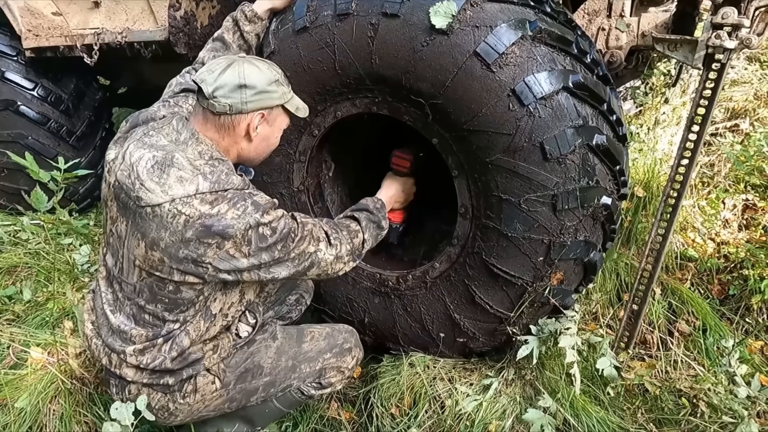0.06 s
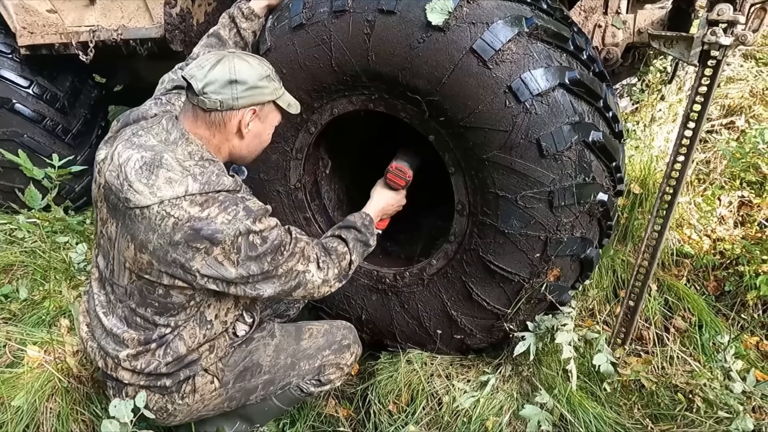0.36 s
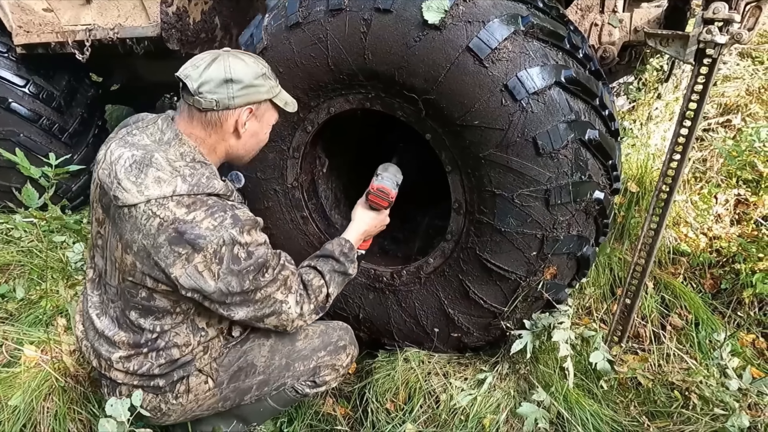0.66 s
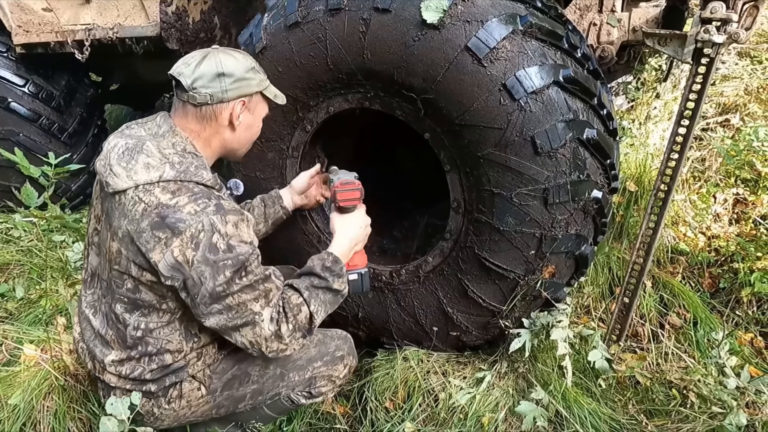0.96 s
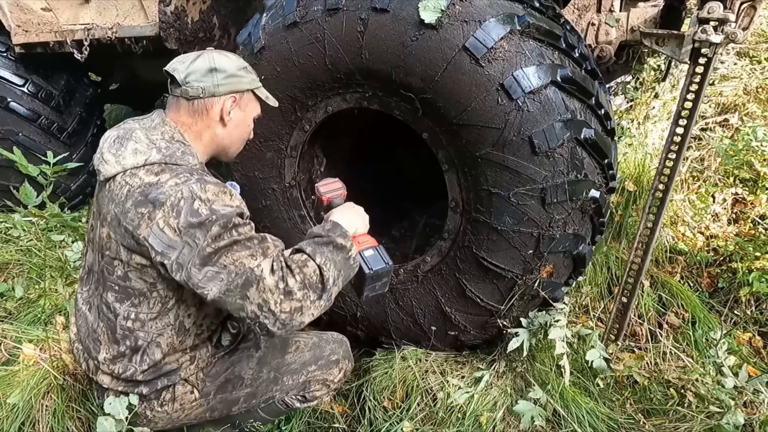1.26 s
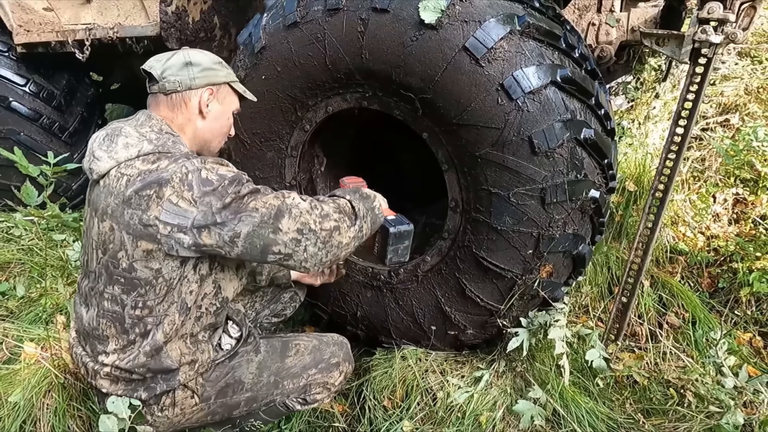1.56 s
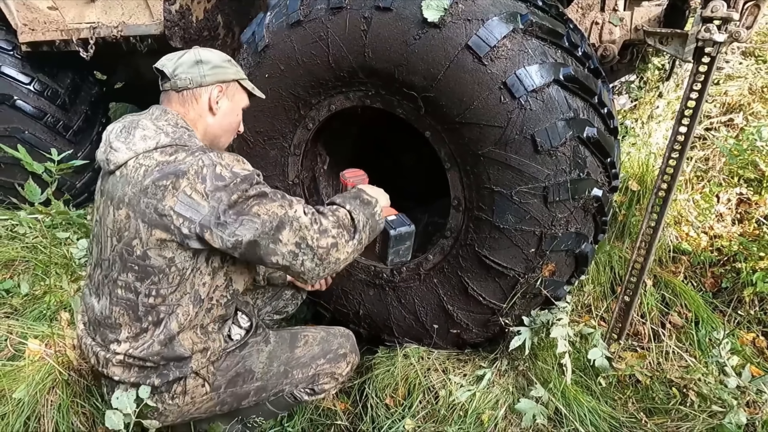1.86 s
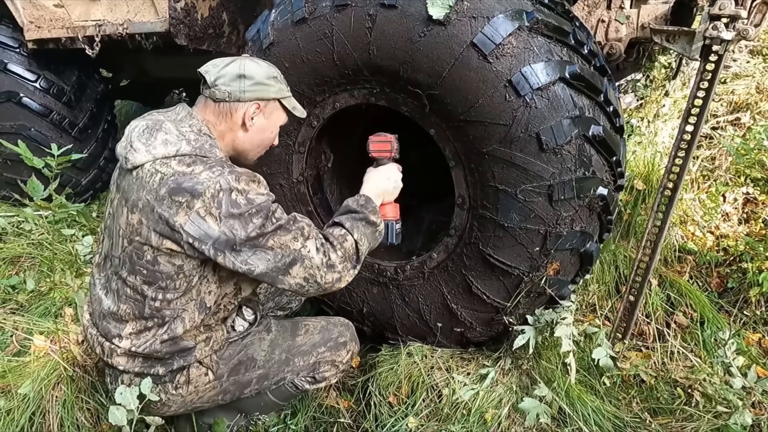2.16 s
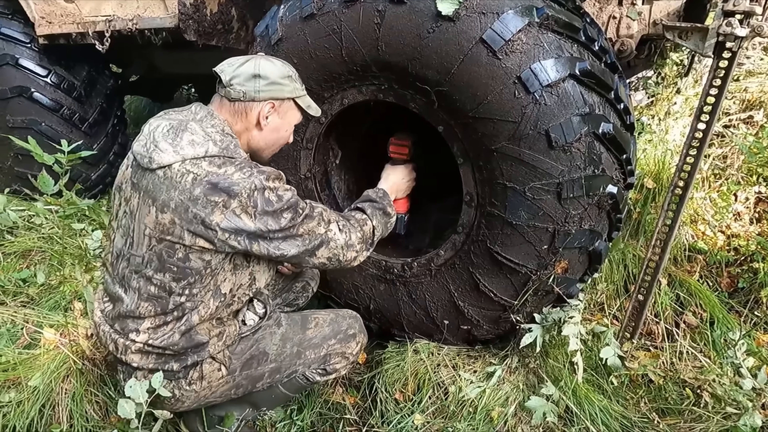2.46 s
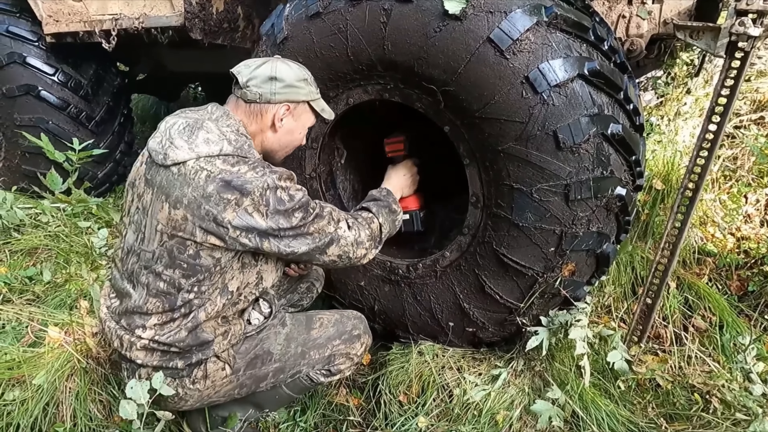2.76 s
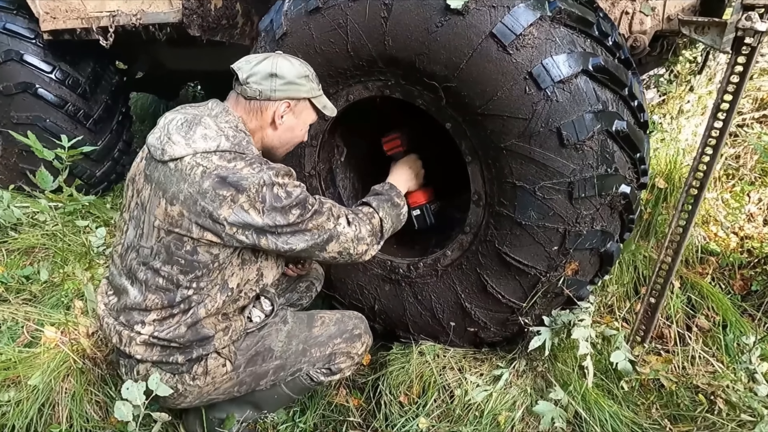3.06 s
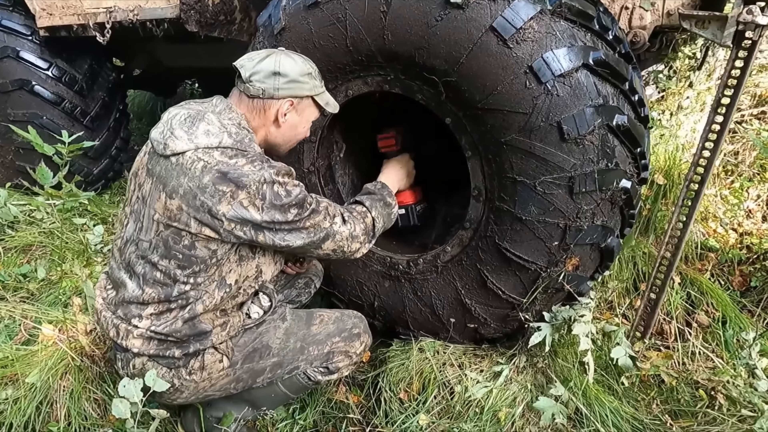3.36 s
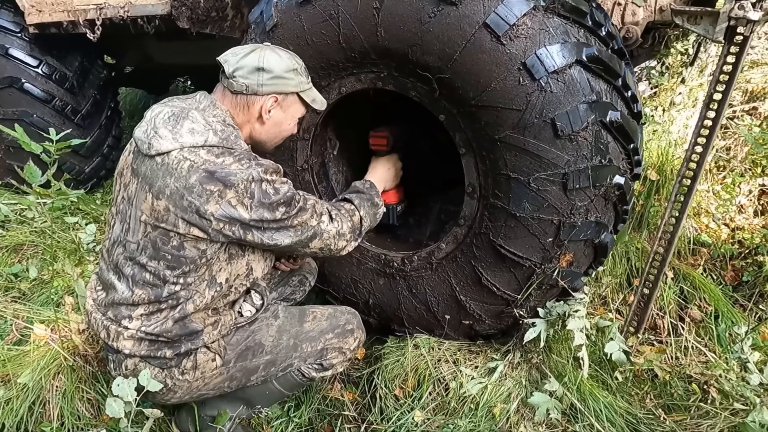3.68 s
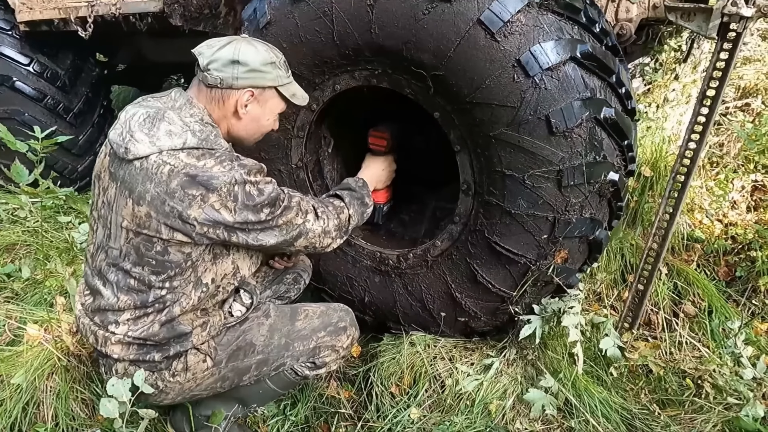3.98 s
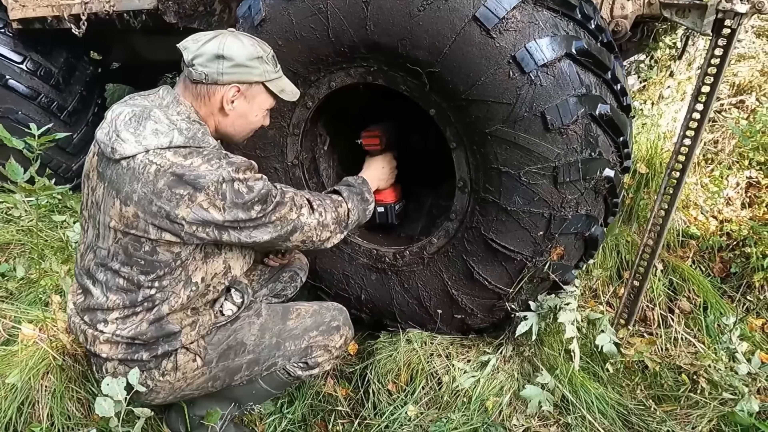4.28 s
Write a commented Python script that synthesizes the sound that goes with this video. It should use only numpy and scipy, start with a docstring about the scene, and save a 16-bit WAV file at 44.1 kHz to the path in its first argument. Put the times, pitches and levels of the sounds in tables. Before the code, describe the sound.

A cordless impact wrench whines and hammers in short bursts on wheel nuts, between ringing steel clangs and knocks, in a quiet forest.

```python
"""A cordless impact wrench spins wheel nuts off inside the deep steel rim of a big tyre, outdoors.
Its gears whine and the loose socket rattles; on a tight nut the hammer strikes about 32 times a second.
Between runs the socket knocks on the studs, steel clangs on the ringing rim, and metal gives
bright chinks and hollow knocks. Behind it, a quiet forest: leaves hiss and the air stirs."""
import sys
import numpy as np
from scipy import signal
from scipy.fft import rfft, irfft, next_fast_len
from scipy.io import wavfile

SR = 44100
rng = np.random.default_rng(int(sys.argv[2]) if len(sys.argv) > 2 else 0)


def unload_wav(signal):
    """Save mono or channel-first audio to the path in sys.argv[1] as 16-bit WAV at rate SR, clipped to [-1, 1]."""
    wavfile.write(
        sys.argv[1],
        SR,
        np.round(np.clip(np.atleast_2d(signal).T, -1, 1) * 32767).astype(np.int16),
    )


N = 398663
TIME = np.arange(N) / SR
BLOWS_PER_S = 32.55

# Trigger pulls. Each row: pull and release in seconds, then gears, loose socket, treble fizz,
# boost at full load and coasting, all in dB.
RUNS = [(-0.1, 0.2, -17, -32.5, -42.5, 2.5, -54), (3.481, 4.383, -17, -33, -32.5, 2.5, -52),
        (6.994, 7.168, -16.5, -20, -25.5, 0, -35.5), (7.328, 7.73, -17, -26, -33, 6, -52),
        (8.107, 8.372, -11, -19.5, -27, 0, -36)]
# Working speed the nut allows. Each row: time in seconds, rotor turns per second.
WORKING_SPEED = [(0.02, 372), (.11, 445), (3.56, 415), (3.67, 408), (3.76, 338), (4.14, 345), (4.25, 410),
                 (4.32, 445), (7.06, 390), (7.42, 385), (7.455, 420), (7.49, 374), (7.53, 366), (7.59, 415),
                 (7.7, 445), (8.19, 385), (8.27, 426), (8.38, 445)]
# Hammering on a tight nut. Each row: first and last blow in seconds, crack, clank and thud in dB.
HAMMERING = [(3.574, 3.635, -13, -13.5, -6), (3.764, 4.133, -9, -14.5, -21),
             (7.06, 7.154, -13, -19.5, -12.5)]
# Spectra of the tool housing and the rim's dense modes. Each row: frequency in Hz, relative level in dB.
HOUSING_SPECTRUM = [(300, -10.5), (540, -4), (700, -7), (950, -4.5), (1290, 0.5), (1490, -6), (1750, -5),
                    (2000, -2), (2450, -10.5), (2720, 8.5), (2920, 6.5), (3250, -12), (3800, -2),
                    (4300, -9.5), (5000, -1.5), (6200, -10), (6700, -19.5), (7500, -8.5), (8500, -33),
                    (11000, -46)]
RIM_SPECTRUM = [(450, -8.5), (750, -6), (1050, 2.5), (1400, -3.5), (1900, -12.5), (2250, -0.5), (2550, -14),
                (2950, -3), (3250, -22.5), (3600, -19.5)]


def amp(db):
    """Decibels to gain."""
    return 10 ** (np.asarray(db) / 20)


def unit_rms(x):
    """Scales to rms 1."""
    return x / np.sqrt(np.mean(x ** 2) + 1e-20)


def unit_attack(x):
    """Scales a hit to rms 1 over its first 12 ms."""
    return x / np.sqrt(np.mean(x[:round(.012 * SR)] ** 2) + 1e-20)


def db_at(spectrum, hz):
    """Interpolates a spectrum on a log-frequency axis."""
    knots_hz, db = np.transpose(spectrum)
    return np.interp(np.log(hz + 1), np.log(knots_hz + 1), db)


def add(mix, start_s, sound):
    """Lays a sound into the mix."""
    part = mix[max(round(start_s * SR), 0):][:len(sound)]
    part += sound[:len(part)]


def colour(x, spectrum):
    """Minimum-phase filter, falling 24 dB per octave beyond the spectrum's ends."""
    hz = abs(np.fft.fftfreq(4096, 1 / SR)) + 1
    octaves_below = np.maximum(np.log2(spectrum[0][0] / hz), 0)
    octaves_above = np.maximum(np.log2(hz / spectrum[-1][0]), 0)
    gain_db = np.maximum(db_at(spectrum, hz) - 24 * (octaves_below + octaves_above), -100)
    response = np.exp(np.conj(signal.hilbert(np.log(amp(gain_db)))))
    return signal.oaconvolve(x, np.fft.ifft(response).real)[:len(x)]


def noise(spectrum, samples=N):
    """Coloured Gaussian noise."""
    return colour(rng.standard_normal(samples), spectrum)


def wander(rate_hz):
    """Smooth random drift, rms 1."""
    size = next_fast_len(N)
    hz = np.fft.rfftfreq(size, 1 / SR)
    return unit_rms(irfft(rfft(rng.standard_normal(size)) / (1 + (hz / rate_hz) ** 4), size)[:N])


def ring(modes, t, scatter_db, detune=0.):
    """Decaying modes, each struck a little differently."""
    hz, db, t60_s = np.transpose(modes)[:, :, None]
    strength, shift = rng.standard_normal((2, len(modes), 1))
    sign = rng.choice([-1, 1], (len(modes), 1))
    envelope = amp(db + scatter_db * strength - 60 * t / t60_s)
    return (sign * envelope * np.sin(2 * np.pi * hz * (1 + detune * shift) * t)).sum(0)


def spin(pull_s, release_s, spin_up_s=0.08, brake_s=0.045):
    """Share of working speed: soft start, hold, brake."""
    braking = np.exp(-np.maximum(TIME - release_s, 0) / brake_s)
    return np.clip((TIME - pull_s) / spin_up_s, 0, 1) * braking


def blow_times(first_s, last_s):
    """The hammer slips over its cam at a steady rate."""
    return first_s + np.arange(round((last_s - first_s) * BLOWS_PER_S) + 1) / BLOWS_PER_S


def rotor_speed(sag=.15):
    """Turns per second: the rotor leaps after each blow, then slows as it winds the hammer spring."""
    blows_s = np.concatenate([blow_times(first_s, last_s) for first_s, last_s, *_ in HAMMERING])
    latest_s = blows_s[np.maximum(np.searchsorted(blows_s, TIME) - 1, 0)]
    cycle = (TIME - latest_s) * BLOWS_PER_S
    winding = np.where((cycle > 0) & (cycle < 1), .5 - cycle, 0)
    flutter = .005 * wander(rate_hz=80.)
    share = np.max([spin(pull_s, release_s) for pull_s, release_s, *_ in RUNS], axis=0)
    return share * np.interp(TIME, *np.transpose(WORKING_SPEED)) * (1 + sag * winding + flutter)


def gear_whine(rotor_hz, turns, case_hz=4950, case_width_hz=450, case_db=11):
    """Rough gear tones, loudest under load and near the gear case resonance."""
    # One entry per tone: multiple of rotor speed; relative level in dB.
    orders = [3, 4, 5, 6, 7, 8, 10, 11, 12, 13, 14, 15, 17.5]
    levels_db = [-1.5, 4.5, -1.5, -2.5, -0.5, -2.5, -8.5, -12, -1.5, -19, -17, -2, -7]
    out = np.zeros(N)
    for order, db in zip(orders, levels_db):
        resonance_db = case_db / (1 + ((order * rotor_hz - case_hz) / case_width_hz) ** 2)
        backlash_rad = .36 * wander(rate_hz=200.)
        gain = amp(db + resonance_db + 4 * wander(rate_hz=70.))
        out += gain * np.sin(2 * np.pi * order * turns + backlash_rad)
    load_gain = np.interp(rotor_hz, [200, 335, 385, 425, 445], [0, 1.6, 1.2, .75, .3])
    return load_gain * out


def wrench(ticks_per_s=700., free_hz=456, loaded_hz=384, spin_exponent=3.8, coast_s=0.16):
    """Gear teeth and the loose socket excite the housing, louder with spin and load."""
    # Socket rattle, treble fizz, coasting socket. Each row: frequency in Hz, relative level in dB.
    socket_spectrum = [(700, -18.5), (1000, -12), (1250, 2.5), (1500, -0.5), (1780, 3), (2100, -15),
                       (2600, -14)]
    fizz_spectrum = [(5000, -19.5), (8000, -3.5), (10500, -3), (12500, -4.5), (15000, -19)]
    coast_spectrum = [(150, 5.5), (500, 2.5), (900, 0.5), (1450, 10.5), (2200, -7.5), (2830, -2),
                      (3300, -16.5), (5200, -11.5), (7000, -15.5), (12000, -26)]
    rotor_hz = rotor_speed()
    turns = np.cumsum(rotor_hz) / SR
    ticks = (rng.random(N) < ticks_per_s / SR) * rng.standard_normal(N)
    turn_swell = 1 + 0.082 * np.cos(2 * np.pi * turns)
    socket_wobble = amp(1.5 * wander(rate_hz=60.))
    drive = (rng.standard_normal(N) + unit_rms(ticks)) * turn_swell * socket_wobble
    spectra = HOUSING_SPECTRUM, socket_spectrum, fizz_spectrum, coast_spectrum
    housing, socket, fizz, coasting = (unit_rms(colour(drive, spectrum)) for spectrum in spectra)
    gears = amp(-4) * housing + amp(-15.5) * gear_whine(rotor_hz, turns)
    working_hz = np.interp(TIME, *np.transpose(WORKING_SPEED))
    load = np.clip((free_hz - working_hz) / (free_hz - loaded_hz), 0, 1)
    out = np.zeros(N)
    for pull_s, release_s, gears_db, socket_db, fizz_db, load_db, coast_db in RUNS:
        gain = spin(pull_s, release_s) ** spin_exponent * amp(load_db * load)
        out += gain * (amp(gears_db) * gears + amp(socket_db) * socket + amp(fizz_db - 4.5) * fizz)
        # The loose socket keeps turning briefly after release.
        after_s = np.maximum(TIME - release_s, 0)
        out += amp(coast_db) * (after_s > 0) * np.exp(-(after_s / coast_s) ** 2) * coasting
    return out


def forest(stereo_spread=0.6, stir_db=-54.5):
    """Leaves hiss, air stirs; a soft handling rustle swells near 3.2 s, one low puff of wind at 5.3 s."""
    # Each row: frequency in Hz, relative level in dB.
    air_spectrum = [(12, -26), (20, 3.5), (51, -2.5), (84, -30.5), (108, -12.5), (278, -21.5), (347, -27.5),
                    (587, -39.5), (1640, -29.5), (1780, -35.5), (2850, -40), (3760, -45.5), (12000, -57),
                    (15000, -66.5)]
    # Each row: time in seconds, leaf hiss in dB.
    hiss_levels = [(0.7, -61), (1.7, -56), (4.7, -53.5), (6.3, -50.5), (9, -54)]
    # Each row: centre and half width in seconds, change of stir and of hiss in dB.
    swells = [(3.199, 0.6, 10, 6), (5.331, 0.06, 22, -3.5)]
    mid, side = noise(air_spectrum), noise(air_spectrum)
    air = mid + stereo_spread * np.array([[1], [-1]]) * side
    hiss = signal.sosfilt(signal.butter(2, 170, "high", fs=SR, output="sos"), air)
    low = signal.sosfilt(signal.butter(2, 130, fs=SR, output="sos"), air)
    hiss_db = np.interp(TIME, *np.transpose(hiss_levels)) + wander(rate_hz=8.)
    low_db = stir_db + 2.5 * wander(rate_hz=1.7)
    for centre_s, width_s, swell_low_db, swell_hiss_db in swells:
        swell = np.exp(-((TIME - centre_s) / width_s) ** 2)
        hiss_db += swell_hiss_db * swell
        low_db += swell_low_db * swell
    return amp(hiss_db) * unit_rms(hiss) + amp(low_db) * unit_rms(low)


def wheel_rumble(rise_s=0.023, t60_s=0.24):
    """The heavy wheel shakes under the running tool and settles when the push ends."""
    # Each row: start and end in seconds, level in dB.
    pushes = [(0.035, 0.2, -27.5), (3.565, 3.66, -13), (3.77, 4.33, -27), (7.047, 7.16, -15),
              (7.42, 7.72, -30.5), (8.23, 8.33, -24)]
    # Each row: frequency in Hz, relative level in dB.
    spectrum = [(15, -39.5), (25, -22), (43, -11), (75, -9.5), (119, -2.5), (157, 6), (226, -7), (268, -8),
                (450, -21), (580, -50.5), (990, -120)]
    envelope = np.zeros(N)
    for start_s, end_s, db in pushes:
        rise = np.clip((TIME - start_s) / rise_s, 0, 1)
        envelope += rise * amp(db - 60 * np.maximum(TIME - end_s, 0) / t60_s)
    return envelope * unit_rms(noise(spectrum))


def steel_burst(spectrum, t, t60_s, tail_db, tail_t60_s, rise_s=.0015):
    """Dense steel modes: a fast-dying burst and its tail in the rim."""
    fade = amp(-60 * t / t60_s) + amp(tail_db - 60 * t / tail_t60_s)
    rise = 1 - np.exp(-t / rise_s)
    return unit_attack(colour(rng.standard_normal(len(t)) * fade * rise, spectrum))


def strike(crack_db, clank_db, thud_db, t60_s, body_spectrum=None):
    """One blow: bright crack, clank of the struck steel, thud of the wheel well."""
    # Crack and default clank. Each row: frequency in Hz, relative level in dB.
    crack_spectrum = [(1800, -22), (2500, 0.5), (2740, 14), (2950, 9), (3300, -2.5), (5000, 0.5),
                      (6500, -8.5), (8500, -15), (11000, -12), (15000, -30)]
    clank_spectrum = [(200, -4.5), (330, -4), (500, -4), (600, -9.5), (780, -3), (880, -6), (1290, -1.5),
                      (1650, -6.5), (2000, -6.5), (2600, -16), (3500, -29)]
    # Air in tyre and wheel well. Each row: frequency in Hz, relative level in dB, T60 in seconds.
    well_modes = [(70, -16, .12), (101, -5, .13), (130, 0, .18), (152, -4, .17), (178, -6, .13),
                  (222, -7, .11)]
    t = np.arange(SR // 2) / SR
    crack = steel_burst(crack_spectrum, t, .85 * t60_s, tail_db=-23, tail_t60_s=.25)
    clank = steel_burst(body_spectrum or clank_spectrum, t, t60_s, tail_db=-17.5, tail_t60_s=0.29)
    thud = unit_attack(ring(well_modes, t, scatter_db=1.0, detune=0.0097) * (1 - np.exp(-t / 0.0012)))
    return amp(crack_db) * crack + amp(clank_db) * clank + amp(thud_db) * thud


def handling(tap_t60_s=0.015, bump_t60_s=0.05):
    """Light taps ring the socket, not the heavy hub; bumps of the tool on the tyre are mostly thud."""
    # Each row: start in seconds, level in dB, click relative to the tap in dB.
    taps = [(0.318, -39, -5.5), (0.348, -40, -9), (1.125, -46, -30.5), (1.153, -40.5, -7),
            (1.271, -41, -3.5), (2.702, -36, -16), (2.931, -34, -8.5), (3.44, -30.5, -12), (4.602, -35, -9),
            (4.648, -34, -13), (5.286, -41.5, -4.5), (5.534, -51, 7.5), (7.953, -44.5, -8.5),
            (6.277, -56, -13), (6.935, -45, -8), (8.069, -42, -14), (8.563, -40, -3.5)]
    # Each row: start in seconds, level in dB.
    bumps = [(2.931, -28), (3.237, -28), (3.314, -20.5), (3.44, -31), (6.842, -25), (7.292, -24)]
    # Each row: frequency in Hz, relative level in dB.
    socket_spectrum = [(200, -3), (400, -5), (800, -10), (1270, 2), (1600, -5), (2100, -8), (2800, -6),
                       (3500, -27)]
    out = np.zeros(N)
    for start_s, db, click_db in taps:
        add(out, start_s, strike(db + click_db, db, db - 16.5, tap_t60_s, socket_spectrum))
    for start_s, db in bumps:
        add(out, start_s, strike(db - 17, db - 14.5, db, bump_t60_s, socket_spectrum))
    return out


def pitched_metal(mode_count=40, rise_s=0.0043):
    """Short pitched metal sounds, bright chinks and hollow knocks, each a cluster of close modes."""
    # Each row: start in seconds, pitch in Hz, spread as a share of pitch, level in dB, T60 in seconds.
    hits = [(1.692, 2453, 0.091, -33.5, 0.96), (1.711, 2808, 0.065, -28.5, 0.93),
            (2.712, 11900, 0.017, -62, 0.23), (2.933, 11700, 0.025, -54, 0.078),
            (2.995, 11920, .02, -42, 0.05), (5.286, 1398, 0.11, -33, 0.022), (5.6, 12000, .02, -50, 0.3),
            (5.84, 11850, .02, -50, 0.28), (7.921, 1310, 0.11, -35, 0.023),
            (7.951, 1293, 0.11, -31.5, 0.025), (8.468, 11900, 0.032, -44.5, 0.28),
            (8.51, 2545, 0.067, -35.5, 0.019), (8.527, 2690, .05, -28, 0.02)]
    out, t = np.zeros(N), np.arange(SR) / SR
    rise = 1 - np.exp(-t / rise_s)
    for start_s, hz, spread, db, t60_s in hits:
        modes = [(hz * (1 + spread * offset), 0, t60_s) for offset in rng.uniform(-1.7, 1.7, mode_count)]
        add(out, start_s, amp(db) * unit_attack(ring(modes, t, scatter_db=2.0) * rise))
    return out


def rim_scrape(centre_s=1.738, width_s=0.017, db=-16.0):
    """Steel slides along the rim, swelling around the first clang."""
    # Each row: frequency in Hz, relative level in dB.
    spectrum = [(1900, -8), (2300, -3.5), (2900, 9.5), (3300, -10.5), (5500, -3), (8000, -25), (14000, -31)]
    grit = unit_rms(colour(rng.standard_normal(N) ** 3, spectrum))
    return amp(db) * np.exp(-((TIME - centre_s) / width_s) ** 2) * grit


def rim_clangs(strike_t60_s=0.04, wash_t60_s=.95):
    """Steel hits the rim hard: the hub gives a hollow clonk and the rim rings on."""
    # Each row: start in seconds, then crack, clank, thud, hub clonk and rim ring in dB.
    clangs = [(1.728, -13, -19, -21, -9, -24.5), (2.0367, -21, -16.5, -33.5, -14, -36),
              (5.587, -9.5, -10.5, -18, -9.5, -18), (5.8327, -19, -16, -32.5, -20.5, -36)]
    # Each row: frequency in Hz, relative level in dB, T60 in seconds.
    hub_modes = [(216, 3.5, 0.14), (258.7, -3.5, 0.09), (313, 4, .1), (328, 1.5, 0.029), (557, -3, 0.09),
                 (762.5, 8, 0.077), (1250, -10.5, 0.21)]
    rim_modes = [(515, 19.5, 0.36), (716, 4.5, 1.6), (776, 21, 0.46), (910, -7, 0.25), (1030, -1.5, 0.62),
                 (1028, 3.5, 1.9), (1060, 19, 0.5), (1030, -7, 0.8), (1222, -4.5, 1.5), (1173, -14, 1.4),
                 (1324, -20, 4), (1394, -17, 0.62), (1560, -15.5, 0.48), (1750, -7, 1.2), (2100, -6.5, .9),
                 (2260, -13, 0.97), (2330, 0, 0.33), (2790, -1, 0.7), (2770, 4.5, 0.8), (2853, -8.5, 0.7),
                 (2860, -5.5, 0.3), (3020, 2.5, 0.23), (2930, -24, 0.3)]
    out, t = np.zeros(N), np.arange(2 * SR) / SR
    for start_s, crack_db, clank_db, thud_db, clonk_db, ring_db in clangs:
        add(out, start_s, strike(crack_db, clank_db, thud_db, strike_t60_s))
        clonk = unit_attack(ring(hub_modes, t, scatter_db=6.0, detune=0.0033))
        wash = unit_rms(noise(RIM_SPECTRUM, len(t))) * amp(-60 * t / wash_t60_s)
        tones = unit_attack(ring(rim_modes, t, scatter_db=7.0))
        add(out, start_s, amp(clonk_db) * clonk + amp(ring_db) * (amp(-3) * tones + amp(-6) * wash))
    return out


def socket_knocks():
    """Pushed on and pulled off the nuts, the socket rings together with the hub."""
    # Each row: start in seconds, clank, crack and thud in dB, clank T60 in seconds.
    knocks = [(1.819, -22.5, -35, -29, 0.025), (2.575, -18.5, -27, -21.5, 0.036),
              (2.584, -12, -30, -17.5, .07), (2.875, -13, -22, -21, .06),
              (2.982, -21.5, -25.5, -29.5, 0.027), (3.254, -17.5, -22, -8.5, 0.031),
              (3.503, -23, -24, -22, .04), (3.557, -16.5, -8, -9.5, 0.13),
              (6.564, -26.5, -20.5, -30, 0.039), (6.577, -12, -26, -16.5, .05),
              (6.809, -22, -35.5, -14.5, 0.06), (7.015, -25.5, -19, -33.5, 0.26),
              (7.052, -17.5, -14, -13, 0.053), (7.075, -10, -8.5, -23.5, .05),
              (8.125, -26.5, -21.5, -43.5, 0.09)]
    # Each row: frequency in Hz, relative level in dB.
    spectrum = [(200, 0), (330, -2), (500, -1), (600, -13.5), (780, -4.5), (880, -9), (1290, 0),
                (1650, -2.5), (2000, -11.5), (2600, -15), (3500, -33)]
    out = np.zeros(N)
    for start_s, clank_db, crack_db, thud_db, t60_s in knocks:
        add(out, start_s, strike(crack_db, clank_db, thud_db, t60_s, spectrum))
    return out


def motor_squeak(db=-29.5, squeak_hz=3430, pulse_hz=620, length_s=.018):
    """At a trigger pull the first current pulses make the windings squeak."""
    out, t = np.zeros(N), np.arange(0, length_s, 1 / SR)
    squeak = unit_rms(np.sin(2 * np.pi * squeak_hz * t) * (1 + .45 * np.sin(2 * np.pi * pulse_hz * t)))
    window = signal.windows.tukey(len(t), .6)
    for pull_s, *_ in RUNS:
        if pull_s > 0:
            buzz = unit_rms(noise(HOUSING_SPECTRUM, len(t)))
            add(out, pull_s, amp(db) * unit_rms(squeak + .8 * buzz) * window)
    return out


def hammer(scatter_db=3.5, t60_s=0.037):
    """The hammer strikes the anvil, no two blows alike."""
    out = np.zeros(N)
    for first_s, last_s, *levels_db in HAMMERING:
        for start_s in blow_times(first_s, last_s):
            blow_db = levels_db + scatter_db * rng.standard_normal(3)
            add(out, start_s, strike(*blow_db, t60_s))
    return out


def ring_and_echo(x, ring_db=-38.5, ring_t60_s=1.0, echo_db=-16, echo_t60_s=0.15):
    """The rim rings in sympathy; tyre and ground return a short echo."""
    # Each row: frequency in Hz, relative level in dB.
    echo_spectrum = [(100, 3), (3000, -2), (6000, 5), (12000, -22)]
    t = np.arange(SR) / SR
    rim = noise(RIM_SPECTRUM, SR) * amp(-60 * t / ring_t60_s)
    echo = noise(echo_spectrum, SR) * amp(-60 * t / echo_t60_s)
    tail = amp(ring_db) * rim / np.linalg.norm(rim) + amp(echo_db) * echo / np.linalg.norm(echo)
    return x + signal.oaconvolve(x, tail)[:N]


def stereo_reflections(x):
    """Near reflections, a few ms late, differ left and right, more so in the treble."""
    # Each row: frequency in Hz, side level relative to mid in dB.
    side_spectrum = [(60, -21), (150, -22), (300, -16), (700, -14), (1300, -6), (2800, -8), (5000, -5),
                     (13000, -4)]
    size = next_fast_len(N + SR // 10)
    hz = np.fft.rfftfreq(size, 1 / SR)
    knots_hz = np.linspace(0, SR / 2, num=240)
    lag_rad = np.interp(hz, knots_hz, np.cumsum(rng.uniform(0, 3.5, len(knots_hz))))
    side = irfft(rfft(x, size) * amp(db_at(side_spectrum, hz)) * np.exp(-1j * lag_rad), size)[:N]
    return np.array([amp(-.5) * (x + side), x - side])


def scene():
    """Tool and wheel in the forest, in stereo."""
    tool = wrench() + wheel_rumble() + hammer() + socket_knocks()
    tool += handling() + motor_squeak() + rim_scrape()
    return stereo_reflections(ring_and_echo(tool) + rim_clangs() + pitched_metal()) + forest()


def record(dry):
    """Soft clip at full scale, then low-pass."""
    clipped = dry / (1 + dry ** 6) ** (1 / 6)
    cutoff_hz = 15300
    lowpass = signal.firwin(255, cutoff_hz, window=("kaiser", 8), fs=SR)
    return signal.oaconvolve(clipped, lowpass[None], "same")


dry = scene()
out = record(dry)
unload_wav(out)
```